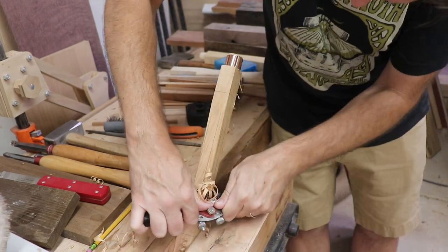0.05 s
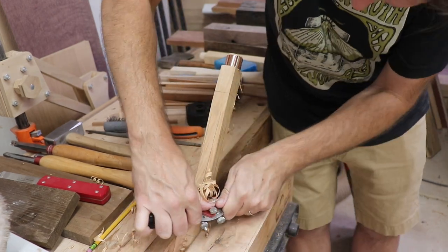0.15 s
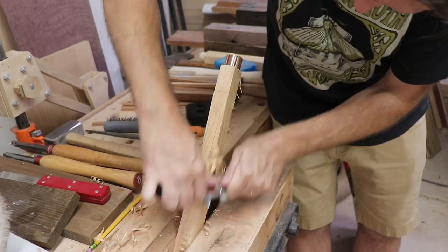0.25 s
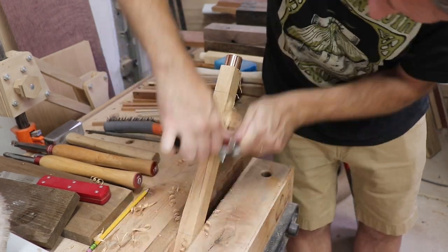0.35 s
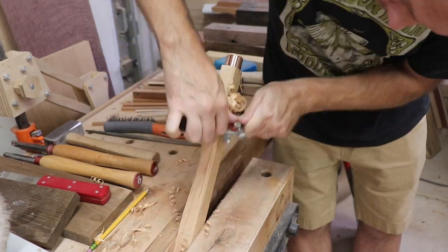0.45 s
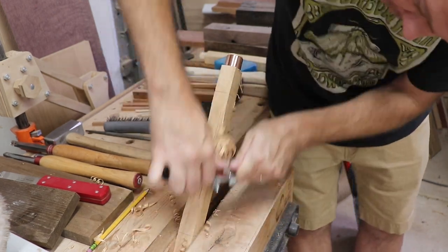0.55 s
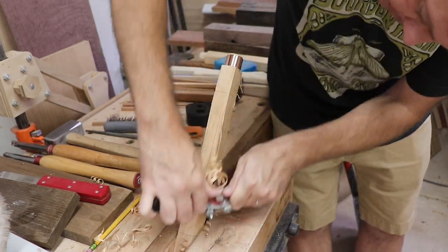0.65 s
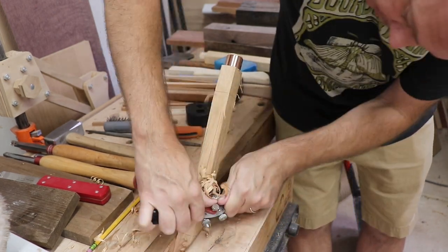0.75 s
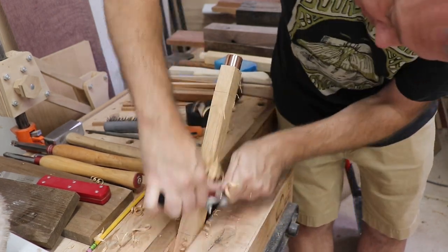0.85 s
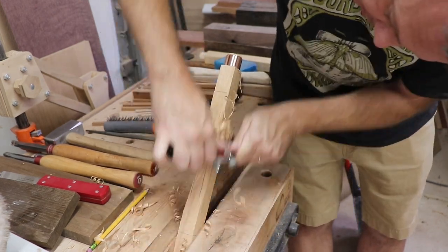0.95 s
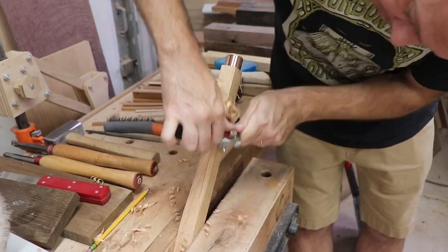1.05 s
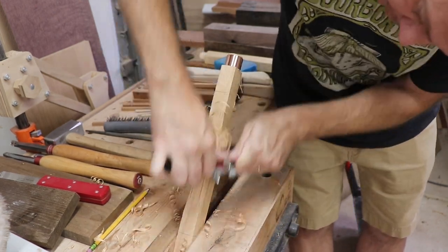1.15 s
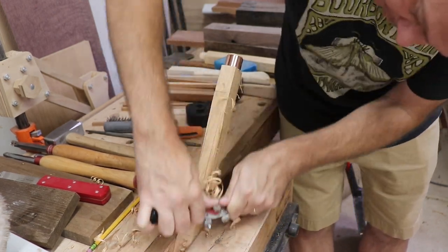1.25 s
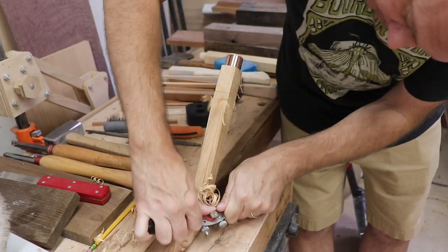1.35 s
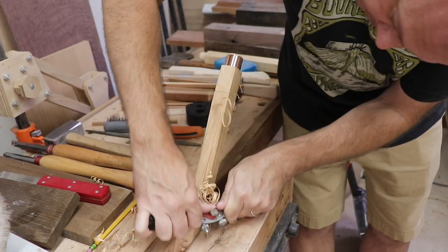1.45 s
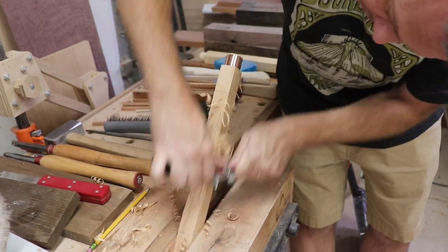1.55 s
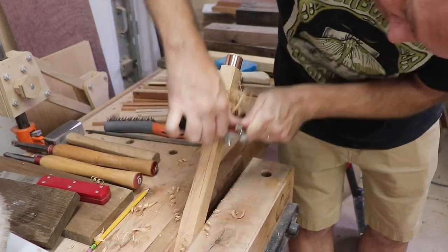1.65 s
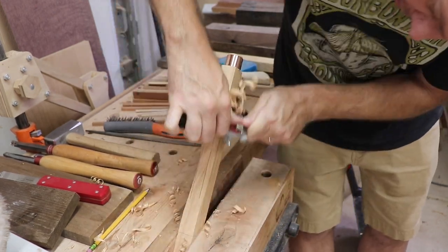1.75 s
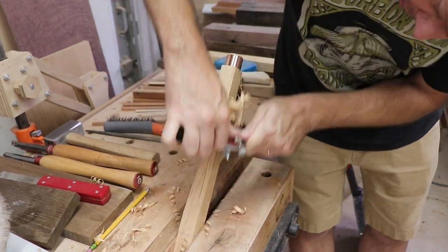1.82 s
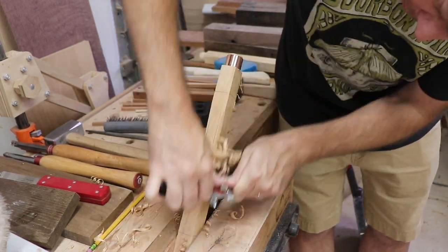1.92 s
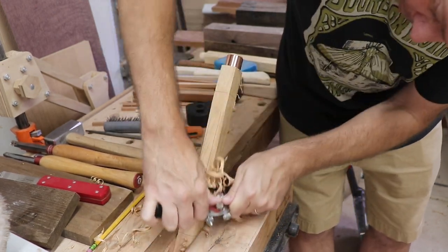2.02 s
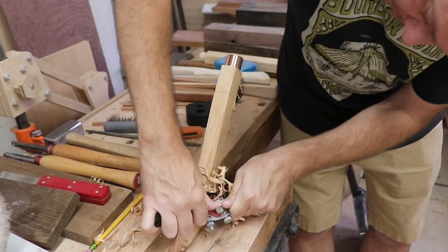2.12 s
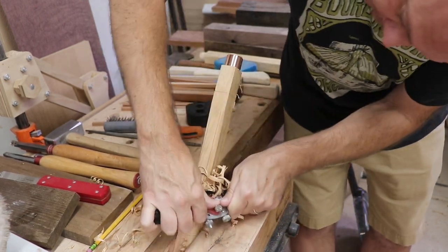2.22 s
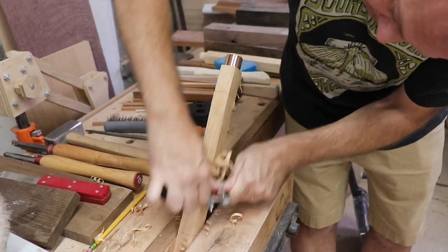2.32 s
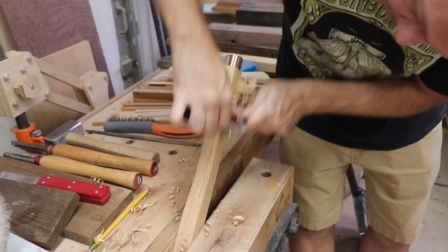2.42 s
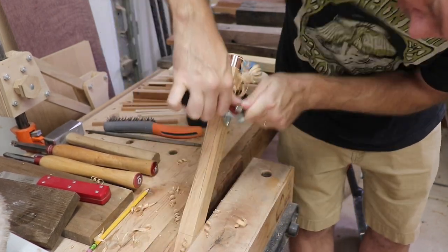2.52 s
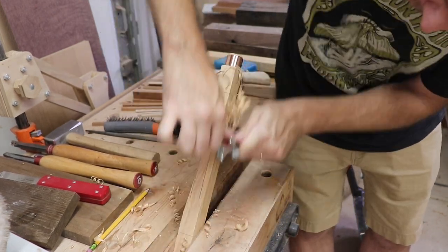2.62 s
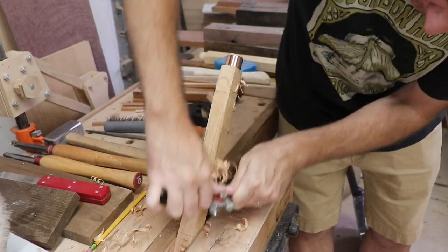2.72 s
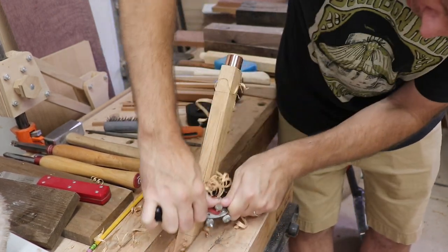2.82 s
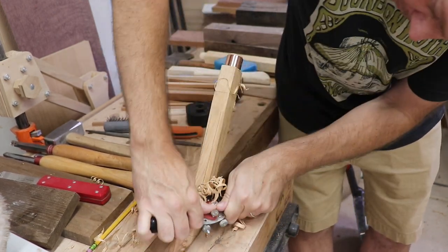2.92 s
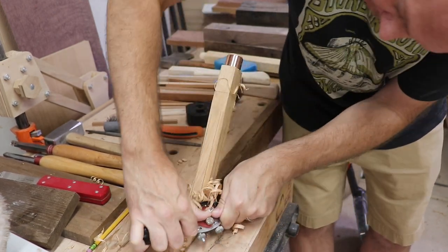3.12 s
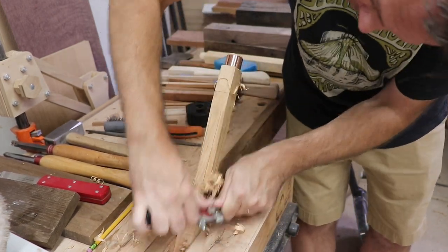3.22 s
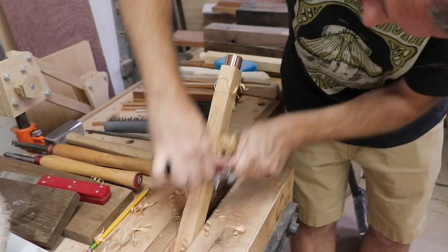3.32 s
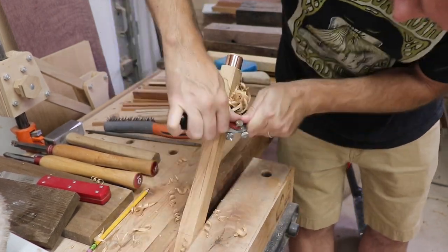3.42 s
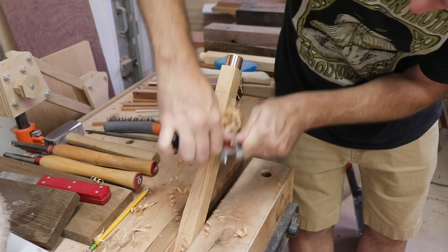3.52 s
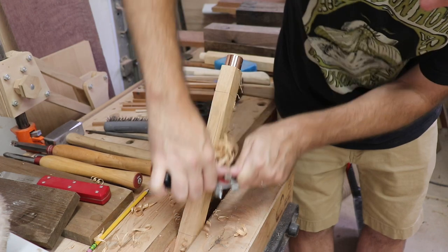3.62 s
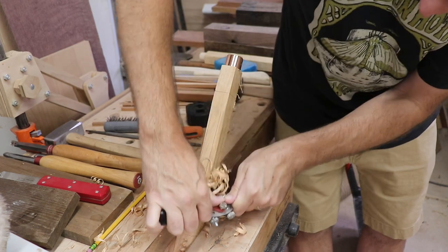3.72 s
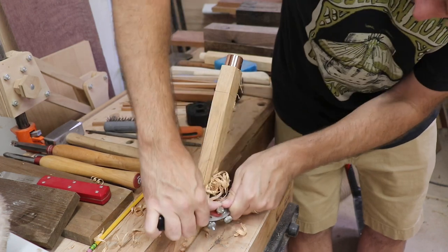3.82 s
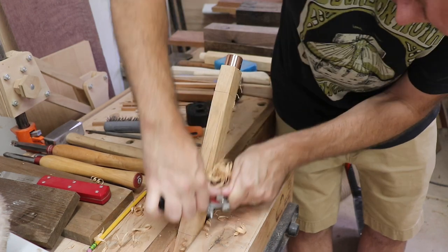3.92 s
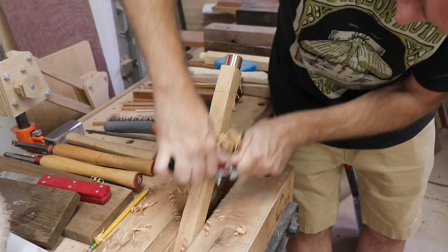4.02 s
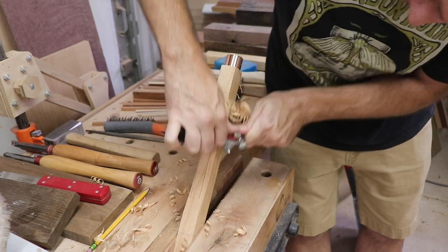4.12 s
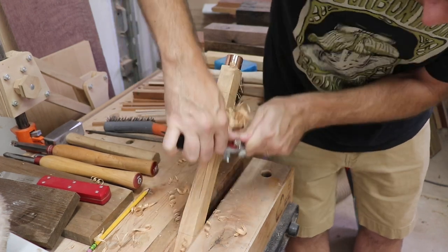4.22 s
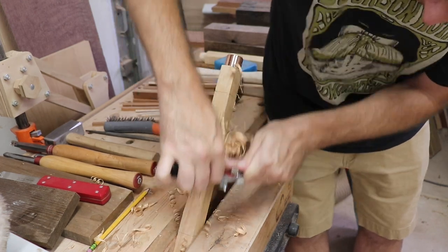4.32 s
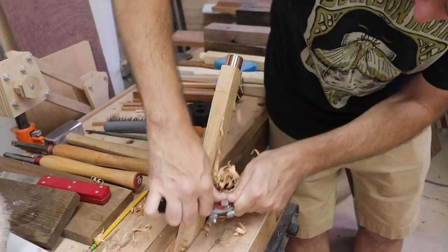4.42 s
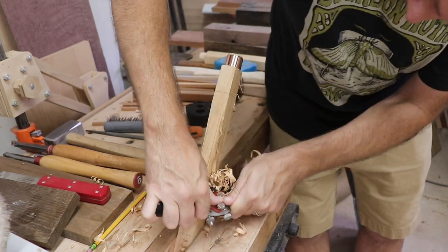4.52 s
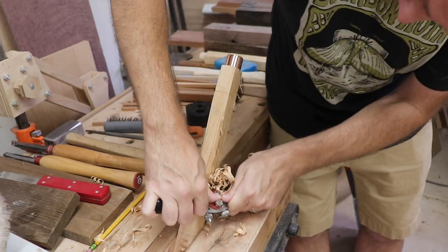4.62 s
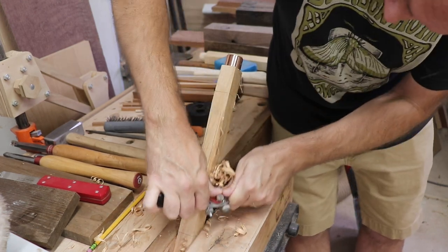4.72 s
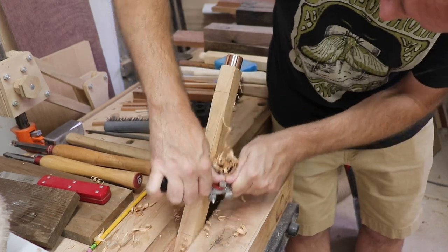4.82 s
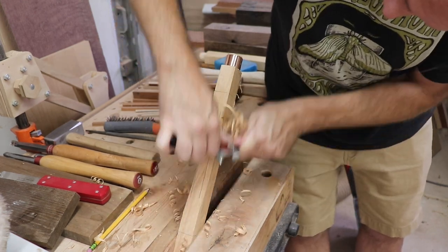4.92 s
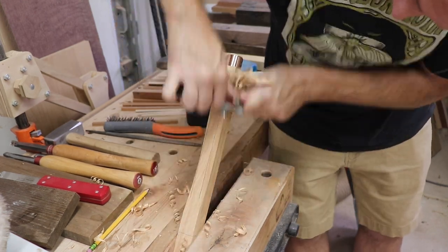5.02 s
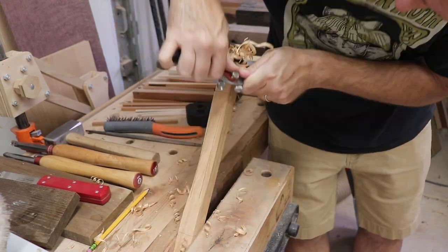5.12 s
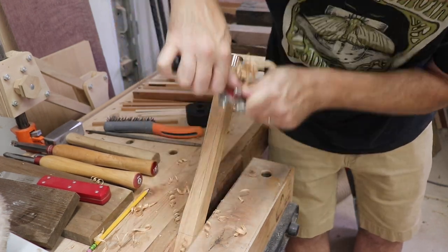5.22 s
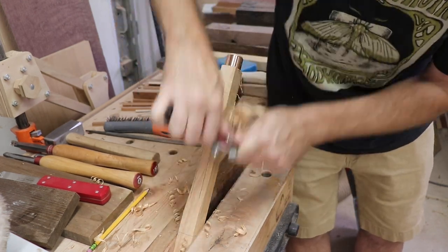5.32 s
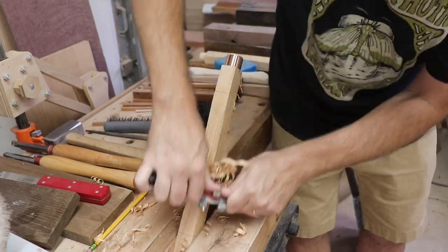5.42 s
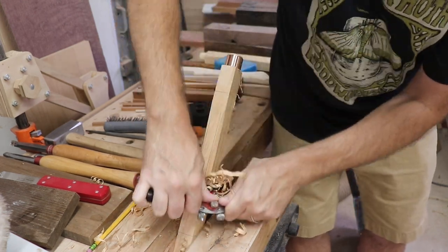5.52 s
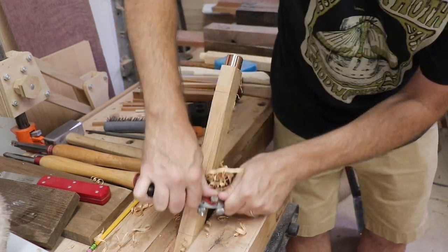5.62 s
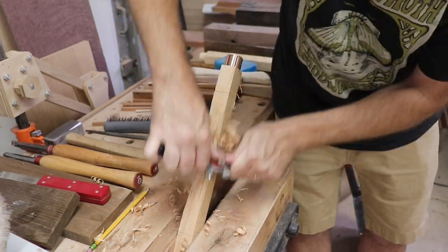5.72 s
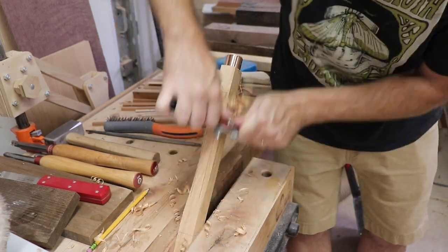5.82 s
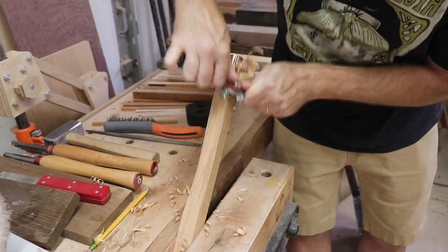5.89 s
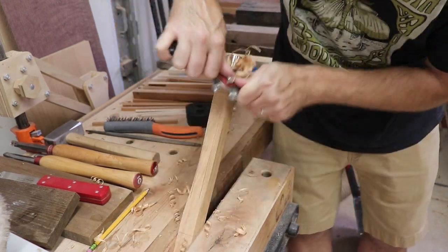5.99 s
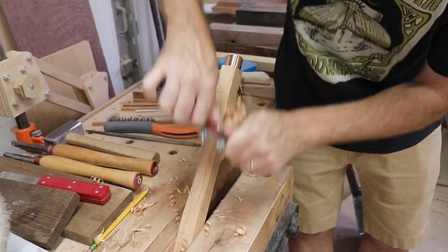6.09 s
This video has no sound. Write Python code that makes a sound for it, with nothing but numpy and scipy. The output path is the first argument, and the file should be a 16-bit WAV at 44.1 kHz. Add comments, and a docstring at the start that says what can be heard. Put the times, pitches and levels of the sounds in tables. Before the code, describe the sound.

Close up in a small workshop, a spokeshave works a wooden handle held in a bench vice. A hollow knock with a tiny metallic rattle precedes most strokes; each is a quick dry rasp, swelling with a slightly rising woody ring and cutting off. Soft brushing returns and crackling shavings fill the gaps, over faint low hum.

```python
"""Eight quick rasping strokes: a spokeshave is pushed along a wooden handle clamped in a bench vice.
The edge tears off a shaving in tiny random fractures, which ring the wood at a gliding pitch.
Between strokes the tool lands with a knock of damped modes, its blade chatters in gritty clicks, dry shavings
snap, and the sole brushes lightly back. Small workshop: noise tails, still air and a low mains hum."""
import sys
import numpy as np
from scipy import signal
from scipy.fft import rfft, irfft, next_fast_len
from scipy.io import wavfile
from scipy.ndimage import uniform_filter1d, map_coordinates

SR = 44100
rng = np.random.default_rng(int(sys.argv[2]) if len(sys.argv) > 2 else 0)


def to_wav(sig):
    """Store sig (one row per channel, or 1-D mono) as 16-bit WAV at the path in sys.argv[1].

    Samples outside -1..1 are clipped; the rate is SR.
    """
    pcm = np.clip(np.atleast_2d(sig), -1, 1) * 32767
    pcm = np.round(pcm).astype(np.int16)
    wavfile.write(sys.argv[1], SR, pcm.T)  # frames by channels


N = 271215

# The cutting strokes; layer levels are ahead of each layer's trim. Each row: start in seconds, run-up in seconds,
# full cut in seconds, wood ring in dB, ring pitch in Hz at full cut, low drag in dB, tearing in dB,
# edge hiss in dB, blade ring in dB, step up at the bite in dB.
STROKES = [(.205, .1, 0.1, -30.5, 1280, -37, -36, -40, -44.5, 2.5),
           (.835, 0.079, .11, -29, 1293, -36.5, -36.5, -40, -39.5, 3.5),
           (1.48, 0.11, 0.093, -26.5, 1323, -32.5, -32.5, -34, -40.5, 2),
           (2.245, 0.11, 0.073, -29.5, 1336, -35, -34, -35.5, -48, 5.5),
           (3.215, .123, 0.073, -31, 1330, -41, -32, -33.5, -33.5, 4.5),
           (3.915, 0.093, 0.14, -28, 1210, -32, -34, -36, -46, 5),
           (4.68, 0.26, 0.098, -32, 1300, -35.5, -36, -37.5, -46, 1),
           (5.69, 0.073, 0.12, -31, 1316, -37.5, -36.5, -36.5, -39.5, 11)]
# The tool landing on the handle. Each row: start in seconds, level in dB, bench thud against the knock in dB,
# contact corner in Hz, ring pitch in Hz, lift of the overtones in dB, tool ring against the knock in dB,
# delay of the blade rattle in seconds, rattle level in dB ahead of the chatter trim.
LANDINGS = [(0.032, -7, 7.5, 1870, 999, 9, -36, 0.0076, -22.5),
            (0.7617, -6.5, -2, 1700, 998, 6, -17.5, 0.014, -11),
            (1.3797, -8.5, 1, 1640, 968.2, 11, -32, .009, -20),
            (2.1534, -12.5, -2, 1510, 1030, 10, -27, 0.0053, -25.5),
            (2.9204, -30, 10.5, 1130, 753, 12, -16.5, 0.0036, -28),
            (3.2172, -36.5, 17, 1510, 890, 19, -24, 0.00059, -44),
            (3.8762, -6.5, 1, 1570, 1013, 10.5, -25.5, .007, -12),
            (4.6442, -1.5, 3.5, 3280, 1029, 13, -25, .007, -20),
            (5.6285, -16, 12, 1140, 863, 7.5, -31, .002, -19)]
# Colour of the low drag of the cut. Each row: frequency in Hz, relative level in dB.
DRAG = [(60, -20.5), (130, 5), (250, 5), (410, 14.5), (560, 8.5), (700, 14.5), (820, 17.5), (950, 11),
        (1300, -53)]
# Colour of the tearing fibres. Each row: frequency in Hz, relative level in dB.
TEAR = [(1200, -54), (1750, 0), (2050, 3.5), (2380, 3.5), (2750, 2), (3130, -3.5), (3570, 4), (4000, -3),
        (4500, -7.5), (5100, 0.5), (5620, 2.5), (5950, -5.5), (6250, 2.5), (7400, -52.5)]


def cutting(ring_db=-1, drag_db=-2, tear_db=-1, edge_db=-2, blade_db=-2, grain_db=2.0, judder_db=0.0, splinter_db=-11):
    """The shaving breaks in tiny steps among coarser splinters; uneven grain makes the blade bite and ease."""
    # Hiss of the edge. Each row: frequency in Hz, relative level in dB.
    edge_colour = [(5000, -42.5), (6800, 0.5), (7700, -2), (9500, 1.5), (11200, 5), (12600, 2.5),
                   (15000, -2.5), (16200, -12.5)]
    # Ring of the blade in the cut. Each row: frequency in Hz, relative level in dB.
    blade_colour = [(4300, -37.5), (5000, 1), (5300, 0.5), (5600, 0), (6600, -36)]
    bite = unit(amp(grain_db * wobble(45) + judder_db * wobble(320)))
    # coarse breaks reach every layer at once
    splinters = amp(splinter_db) * fractures(rate=350, spread_db=4.5)
    chips = bite * (fractures(rate=3500, spread_db=2) + splinters)
    fine_breaks = fractures(rate=12000, spread_db=3.5)
    fibres = shifting(bite * (fine_breaks + splinters), depth_db=3)

    wood = stroke_gain(axis=3, rise_power=2.3, release_share=1.0) * wood_ring(chips, width_hz=474)
    drag = stroke_gain(axis=5, rise_power=.9, release_share=0.72) * coloured(chips, DRAG)
    tear = stroke_gain(axis=6, rise_power=1.37, release_share=0.95) * coloured(fibres, TEAR)
    edge = stroke_gain(axis=7, rise_power=1.58, release_share=1.09) * coloured(fibres, edge_colour)
    blade = stroke_gain(axis=8, rise_power=2.5, release_share=2.0) * coloured(chips, blade_colour)
    mix = amp(ring_db) * wood + amp(drag_db) * drag + amp(tear_db) * tear
    return mix + amp(edge_db) * edge + amp(blade_db) * blade


def stroke_gain(axis, rise_power, release_share):
    """Gain of one layer (column axis): skid, run-up, bite, release; each follows the push at its own steepness."""
    # the push eases during the cut (steeper layers ease faster), then the edge runs out
    sag_db_per_s, base_release_db_per_s = 25, 269.5
    skid_db, skid_s = -23.5, 0.044  # the sole skids around the start: level against the cut, time to each side
    bite_s = .005  # after the run-up the edge digs in, and the level steps up within this time
    t, gain = np.arange(N) / SR, np.zeros(N)
    for row in STROKES:
        start, rise, hold, *_, bite_db = row
        # the power below multiplies the release, hence the division
        effort = push(start, rise, hold, sag_db_per_s, base_release_db_per_s * release_share / rise_power)
        skid = amp(skid_db) * np.clip(1 - np.abs(t - start) / skid_s, 0, 1)
        bite_progress = np.clip((t - start - rise) / bite_s, 0, 1)
        depth = amp(bite_db * (bite_progress - 1))
        gain += amp(row[axis]) * depth * (effort ** rise_power + skid)
    return gain


def wood_ring(pulses, width_hz):
    """A resonance of the handle, excited by the pulses, that rises as the blade travels along it."""
    glide_hz_per_s = 460
    t, pitch = np.arange(N) / SR, np.full(N, float(STROKES[0][4]))
    for start, rise, hold, _, hz, *_ in STROKES:
        glide = glide_hz_per_s * (np.minimum(t - start, rise + hold) - rise)
        pitch = np.where(t >= start, hz + glide, pitch)
    # shift the moving pitch to zero, low-pass there, and shift back
    turn = np.exp(2j * np.pi * np.cumsum(pitch) / SR)
    narrow = signal.lfilter(*signal.butter(2, width_hz / 2, fs=SR), pulses / turn)
    return unit((turn * narrow).real)


def catches(ring_db=-3, tear_db=-7):
    """Where the edge catches in the grain and judders, a short burst of coarse chips shakes the handle."""
    # The catches. Each row: centre in seconds, length in seconds, level in dB.
    judders = [(0.401, 0.0075, -32), (1.537, 0.056, -48), (2.296, 0.021, -44), (2.353, 0.02, -30.5),
               (2.489, 0.057, -41.5), (3.277, 0.029, -31.5), (5.986, .025, -42.5)]
    t = np.arange(N) / SR
    chips = fractures(rate=2000, spread_db=2)
    gain = sum(amp(db) * np.exp(-(2 * (t - s) / length) ** 2 / 2) for s, length, db in judders)
    drag = coloured(chips, DRAG)
    wood = amp(ring_db) * wood_ring(chips, width_hz=660)
    tear = amp(tear_db) * coloured(chips, TEAR)
    return gain * unit(drag + wood + tear)


def landings(bench_rise_s=0.0083, radiate_hz=680, boards_db=-21, boards_t60=0.1, bounce_db=-16.5, bounce_t60=0.09):
    """The sole strikes: harder contacts are brighter, the tool bounces and rings, the heavy bench answers later."""
    # The handle in the vice. Each row: multiple of the ring pitch, level in dB ahead of the overtone lift,
    # time to fall 60 dB in seconds.
    handle_modes = [(0.598, -40, 0.049), (.715, -8.5, 0.18), (0.83, -1, 0.15), (.92, -1.5, 0.053),
                    (1, 17, 0.045), (1.16, 8.5, 0.024), (1.33, 8, 0.023), (1.53, -7, 0.042),
                    (1.97, -8, 0.026), (2.3, 3.5, 0.016), (2.55, -4.5, 0.0108), (3.55, -25, 0.02)]
    # The bench under it. Each row: frequency in Hz, level in dB, time to fall 60 dB in seconds.
    bench_modes = [(144.7, -34.5, 0.12), (247, -22.5, 0.096), (414, -14.5, 0.071)]
    # The body of the spokeshave ringing on. Each row: frequency in Hz, level in dB, time to fall 60 dB in seconds.
    body_modes = [(2036, -0.5, 0.11), (1918, -4, 0.21), (3590, -5.5, 0.074), (8000, -19.5, .1)]
    # Dense answer of the loaded bench top. Each row: frequency in Hz, relative level in dB.
    boards_colour = [(60, -17.5), (130, -25), (260, -8.5), (340, -5.5), (430, 10), (560, 3), (800, -33.5),
                     (1100, 4), (1700, 8), (2500, -15.5), (3300, 8), (6000, -16.5), (9000, -1)]
    out, t = np.zeros(N), np.arange(SR // 3) / SR
    # a slim handle pushes little air in the bass
    radiation = signal.butter(2, radiate_hz, 'high', fs=SR)
    for s, db, thud_db, corner_hz, pitch_hz, overtone_db, tool_db, delay, _ in LANDINGS:
        contact = signal.butter(2, corner_hz, fs=SR)
        # the spot that is struck decides how much the higher modes ring
        modes = [(multiple * pitch_hz, level + overtone_db * (multiple > np.sqrt(2)), t60)
                 for multiple, level, t60 in handle_modes]
        knock = signal.lfilter(*contact, ring(modes, t, scatter_db=1.5))
        knock = signal.lfilter(*radiation, knock)

        # the sole strikes again, softer, as the blade rattles
        clack = coloured(rng.standard_normal(len(t)), boards_colour) * amp(bounce_db - 60 * t / bounce_t60)
        add(out, s + delay, amp(db) * signal.lfilter(*contact, clack) / 2)

        thud = ring(bench_modes, t, scatter_db=1.5)
        boards = signal.lfilter(*contact, coloured(rng.standard_normal(len(t)), boards_colour))
        boards = boards * amp(boards_db - 60 * t / boards_t60)
        bench = (amp(thud_db) * thud + boards) * (1 - np.exp(-(t / bench_rise_s) ** 2))
        tool = amp(tool_db) * ring(body_modes, t, scatter_db=1.5)
        add(out, s, amp(db) * (knock / np.abs(knock).max() + bench + tool))
    return out


def chatter(contact_t60=0.0064, level_db=-3):
    """Each gritty contact of the blade cracks and briefly rings the steel."""
    # The steel blade and body. Each row: frequency in Hz, level in dB, time to fall 60 dB in seconds.
    steel_modes = [(3620, -3, .02), (5050, -12, .014), (5630, -6, .011), (7800, -18, .035),
                   (10400, -13, .018), (11300, 0, .003), (12050, 0, .005), (14000, 0, .0024)]
    out, t = np.zeros(N), np.arange(SR // 10) / SR
    for s, db, hz in blade_contacts():
        grit = rng.standard_normal(len(t)) * amp(-60 * t / contact_t60)
        crack = signal.lfilter(*signal.iirpeak(hz, 2, SR), grit)
        steel = signal.fftconvolve(crack, ring(steel_modes, t, scatter_db=7.5))[:len(t)]
        click = unit(steel) + unit(crack)
        add(out, s, amp(db + level_db) * 2 * click / np.abs(click).max())
    return out


def blade_contacts():
    """Seconds, dB, Hz of each contact: the blade seats, rattles and rebounds after a landing, ticks in between."""
    # Ticks of the blade against the wood. Each row: start in seconds, level in dB ahead of the chatter trim,
    # centre of the crack in Hz.
    ticks = [(0.743, -29, 8050), (1.194, -30.5, 11000), (1.3235, -27, 7300), (2.0806, -36.5, 9500),
             (2.208, -41, 11000), (2.251, -40, 12100), (3.1485, -43, 9000), (3.235, -31, 11000),
             (3.2432, -27, 11000), (3.389, -21, 11000), (5.873, -20, 11000)]
    # seating: level against the blow, crack centre, share of the rattle delay
    seat_db, seat_hz, seat_share = -14, 5600, 0.24
    rattle_hz, rebound_s, rebound_loss_db = 12100, 0.0022, 7.5
    contacts = list(ticks)
    for s, db, *_, delay, rattle_db in LANDINGS:
        contacts.append((s + seat_share * delay, db + seat_db, seat_hz))
        for k in range(3):
            contacts.append((s + delay + k * rebound_s, rattle_db - k * rebound_loss_db, rattle_hz))
    return contacts


def snaps(t60=0.032, sharpness=3, level_db=1):
    """A dry shaving breaks with a short noise burst around its own pitch."""
    # The snaps. Each row: start in seconds, level in dB ahead of the trim, pitch in Hz.
    breaks = [(1.1673, -33, 5200), (3.1692, -41.5, 3630), (3.218, -26, 3900), (4.2926, -24.5, 4200),
              (5.771, -20.5, 3770)]
    out, t = np.zeros(N), np.arange(SR // 20) / SR
    for s, db, hz in breaks:
        burst = unit(signal.lfilter(*signal.iirpeak(hz, sharpness, SR), rng.standard_normal(len(t))))
        add(out, s, burst * amp(db + level_db - 60 * t / t60) / 2)
    return out


def sliding(level_db=-1, crackle=0.6):
    """Drawn back, the sole brushes the wood and the curled shavings crackle."""
    # The return slides. Each row: start in seconds, length in seconds, rub in dB ahead of the trim.
    returns = [(0.492, 0.26, -49.5), (1.118, 0.22, -44.5), (1.998, 0.12, -55.5), (2.632, 0.145, -58.5),
               (3.096, 0.065, -48), (4.225, 0.24, -44), (5.14, 0.091, -62.5), (5.553, 0.21, -50)]
    # Colour of the sliding sole. Each row: frequency in Hz, relative level in dB.
    sole_colour = [(200, -32.5), (700, -7.5), (1300, -7.5), (1600, -7), (2400, -3), (3000, -2.5),
                   (4400, -0.5), (5600, -1), (6600, -6), (8500, -10), (11500, -6), (16000, -8.5)]
    rise_s, sag_db_per_s, release_db_per_s = 0.057, 7, 238
    unevenness = amp(.8 * wobble(70) + 1.2 * wobble(22))
    brush = fractures(rate=20000, spread_db=2) * unevenness
    t = np.arange(SR // 100) / SR
    crumple = rng.standard_normal(len(t)) * amp(-60 * t / .008)
    curls = unit(signal.fftconvolve(fractures(rate=90, spread_db=3.5), crumple)[:N])
    rustle = shifting(brush + crackle * curls, depth_db=2.4)
    gain = sum(amp(db) * push(s, rise_s, abs(length - rise_s), sag_db_per_s, release_db_per_s)
               for s, length, db in returns)
    return amp(level_db) * gain * coloured(rustle, sole_colour)


def workshop(x, wet_db, treble_db, build_s=0.00043):
    """Bench and walls answer with a noise tail whose top treble dies first; it changes as tool and arms move."""
    # Decay of the room. Each row: frequency in Hz, time to fall 60 dB in seconds.
    decay = [(150, 0.88), (400, 0.36), (1200, 0.38), (3000, 0.37), (7000, 0.39), (15000, 0.13)]
    out, block = x.copy(), SR // 2  # a fresh tail every half second
    for start in range(0, N, block):
        hz, t, z = signal.stft(rng.standard_normal(block), SR, nperseg=256)
        colour = amp(along([(2000, 0.0093), (12000, treble_db)], hz))[:, None]
        fade = amp(-60 * t / along(decay, hz)[:, None])
        tail = signal.istft(z * fade * colour, SR, nperseg=256)[1]
        tail = tail * (1 - np.exp(-(np.arange(len(tail)) / SR / build_s) ** 2))
        answer = signal.fftconvolve(x[start:start + block], tail / np.linalg.norm(tail))
        add(out, start / SR, amp(wet_db) * answer)
    return out


def background(hum_db=-52.5, air_db=-57.5):
    """A steady mains hum, a 60 Hz sine, under still workshop air of coloured noise."""
    # Colour of the still air. Each row: frequency in Hz, relative level in dB.
    air_colour = [(20, -13.5), (35, -12), (50, 3.5), (80, -6), (110, 0.5), (150, -7), (250, -10),
                  (420, -10), (700, -17), (1400, -16), (2500, -22.5), (5000, -24), (10000, -29.5),
                  (16000, -28)]
    hum = np.sin(2 * np.pi * 60 * np.arange(N) / SR)
    air = coloured(rng.standard_normal(N), air_colour)
    return amp(hum_db) * hum + amp(air_db) * air


def push(start, rise, hold, sag_db_per_s, release_db_per_s):
    """Effort of one arm movement: it builds evenly, eases a little while held, then dies away."""
    t = np.arange(N) / SR - start
    held = np.clip(t - rise, 0, hold) - hold / 2
    released = np.maximum(t - rise - hold, 0)
    return np.clip(t / rise, 0, 1) * amp(-sag_db_per_s * held - release_db_per_s * released)


def fractures(rate, spread_db):
    """Irregular tiny pulses of uneven size, about rate a second, at rms 1."""
    breaks = rng.random(N) < rate / SR
    signs = rng.choice([-1, 1], N)
    return unit(breaks * signs * amp(spread_db * rng.standard_normal(N)))


def ring(modes, t, scatter_db):
    """Damped modes; grip and striking spot give them slightly new strengths and pitches each time."""
    hz, db, t60 = np.transpose(modes)[:, :, None]
    hz = hz * (1 + .009 * rng.standard_normal(hz.shape))
    level_db = db + scatter_db * rng.standard_normal(db.shape)
    return np.sum(amp(level_db - 60 * t / t60) * np.sin(2 * np.pi * hz * t), axis=0)


def shifting(x, depth_db):
    """Chance patches of colour: the shaving curls and its own resonances wander."""
    z = signal.stft(x, nperseg=512)[2]
    field = uniform_filter1d(rng.standard_normal(z.shape), 6, axis=0)  # smooth over frequency
    field = uniform_filter1d(field, size=9, axis=1)  # and over time
    return unit(signal.istft(z * amp(depth_db * unit(field)), nperseg=512)[1][:N])


def wobble(rate):
    """A smooth random curve, rate knots a second."""
    knots = rng.standard_normal(int(N * rate / SR) + 4)
    return map_coordinates(knots, [np.arange(N) * rate / SR])


def coloured(x, spectrum):
    """x with a (Hz, dB) colour, at rms 1."""
    return unit(filtered(x, lambda hz: amp(along(spectrum, hz))))


def filtered(x, response):
    """x times a response of frequency, padded so that nothing wraps round early."""
    m = next_fast_len(len(x) + SR // 2)
    return irfft(rfft(x, m) * response(np.fft.rfftfreq(m, 1 / SR)), m)[:len(x)]


def along(points, hz):
    """(Hz, value) points, interpolated on a log frequency axis."""
    f, v = np.transpose(points)
    return np.interp(np.log(hz + 1), np.log(f + 1), v)


def amp(db):
    """Decibels to an amplitude factor."""
    return 10 ** (np.asarray(db) / 20)


def unit(x):
    """x scaled to rms 1."""
    return x / np.sqrt(np.mean(x ** 2) + 1e-20)


def add(track, s, sound):
    """Lay a sound into the track at s seconds."""
    part = track[round(s * SR):][:len(sound)]
    part += sound[:len(part)]


def scene():
    """Strokes and blows at the bench, heard from close by in the workshop."""
    strokes = workshop(cutting() + catches() + sliding(), wet_db=-11, treble_db=-11.0)
    blows = workshop(landings() + chatter() + snaps(), wet_db=-11.5, treble_db=-6.5)
    return strokes + blows + background()


def record(dry):
    """The recorder clips at full scale and keeps nothing above its band limit of 16.2 kHz."""
    return filtered(np.clip(dry, -1, 1), lambda hz: hz < 16200)


dry = scene()
out = record(dry)
to_wav(out)
```